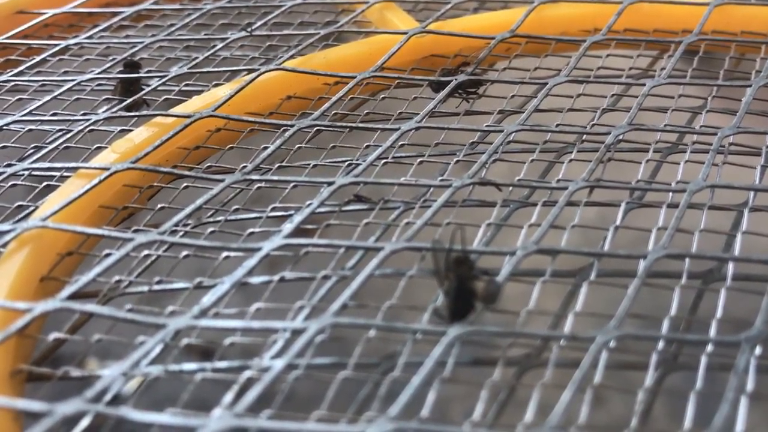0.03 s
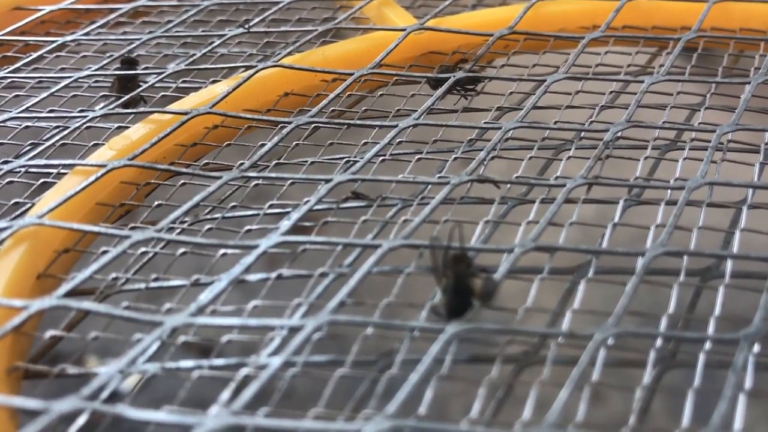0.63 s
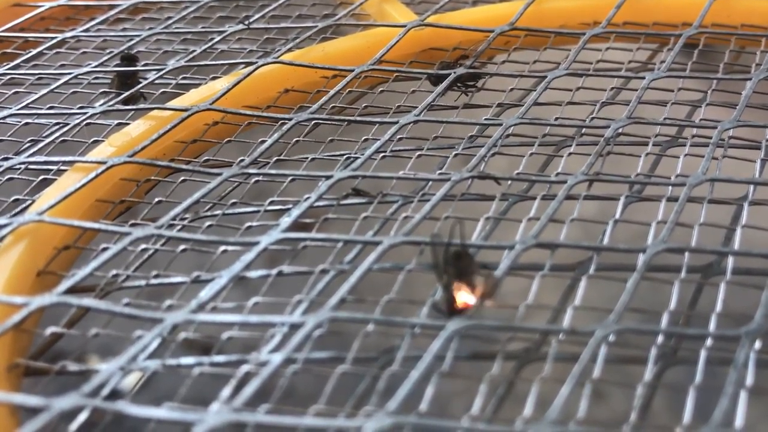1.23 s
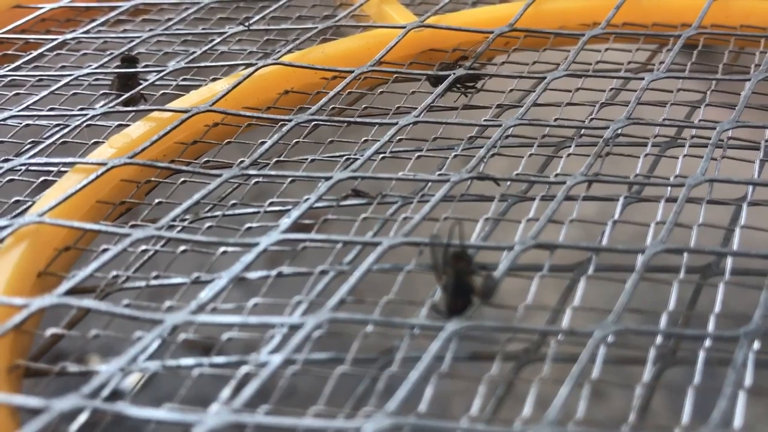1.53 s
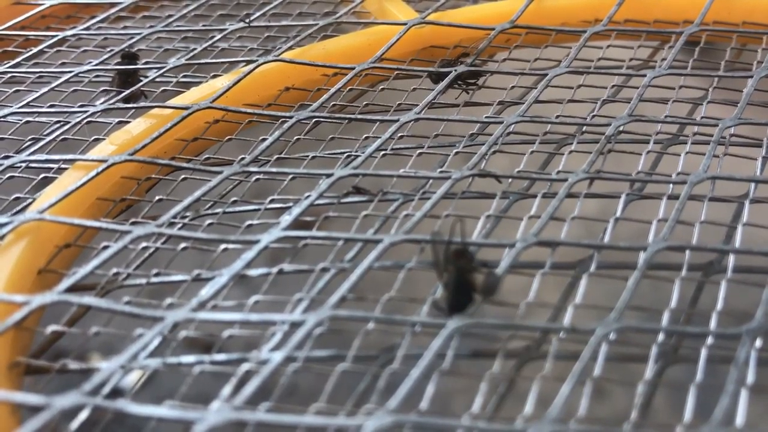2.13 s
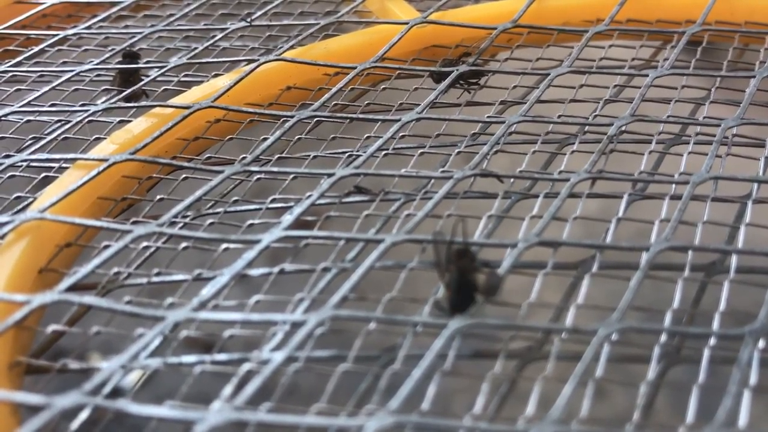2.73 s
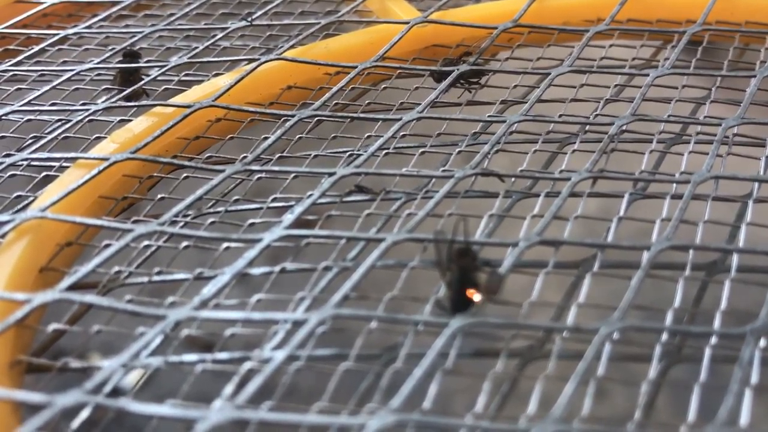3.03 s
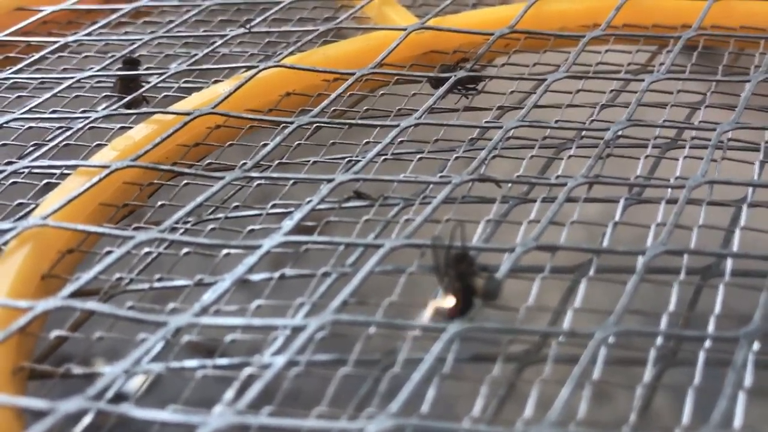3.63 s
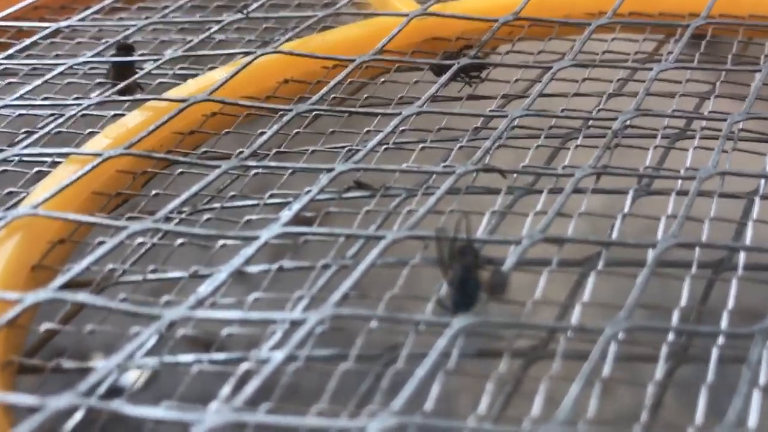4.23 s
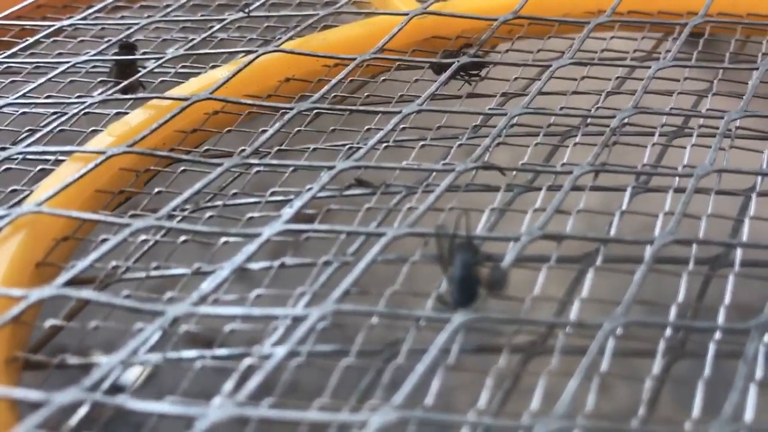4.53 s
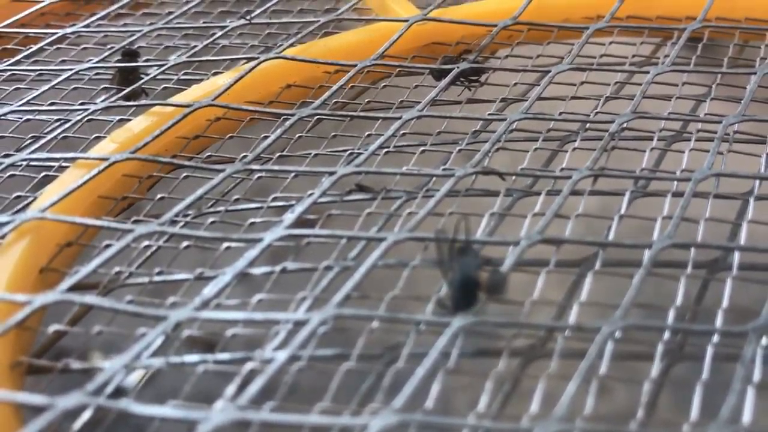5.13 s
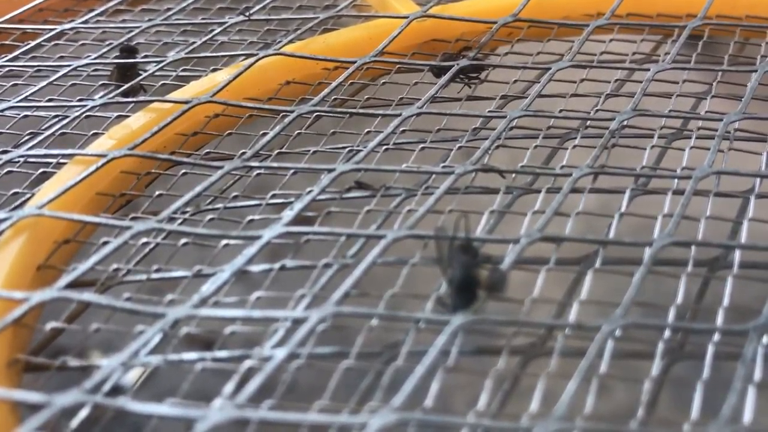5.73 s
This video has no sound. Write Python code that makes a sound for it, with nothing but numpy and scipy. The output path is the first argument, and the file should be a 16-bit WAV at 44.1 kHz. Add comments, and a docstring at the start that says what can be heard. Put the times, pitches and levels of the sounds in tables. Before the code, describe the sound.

In a quiet, humming room, an electric swatter discharges through a trapped fly three times, each a hard snapping pop that distorts the close microphone. The background drops away after each pop and swells back. Tiny bright spark ticks are scattered around the pops, and a faint high charging whine sags and recovers. The second half is much quieter, with a few ticks and brief, faint sizzles.

```python
"""A humming room, close to an electric fly swatter with a fly caught in its mesh.
The converter whines thinly, sagging in pitch under load; small sparks tick, a corona hisses, the fly fries.
Three times the capacitor discharges with a bang that overloads the microphone and rings briefly in the room.
Gain control ducks the hum after each bang and lets it swell back. Later the fly leaks current and sizzles."""
import sys
import numpy as np
from scipy import signal
from scipy.fft import rfft, irfft, next_fast_len
from scipy.io import wavfile
from scipy.ndimage import uniform_filter1d, minimum_filter1d, map_coordinates

SR = 44100
rng = np.random.default_rng(int(sys.argv[2]) if len(sys.argv) > 2 else 0)


def wav_record(signal):
    """Record a signal, one row per channel, as 16-bit PCM in the file named by sys.argv[1]."""
    frames = np.transpose(np.atleast_2d(signal))
    bounded = np.clip(frames, -1, 1)
    # unit amplitude maps onto the largest positive 16-bit level
    quanta = np.round(bounded * 32767).astype(np.int16)
    wavfile.write(sys.argv[1], SR, quanta)


N = 263277

# motor hum: f/Hz, level/dB
HUM_LINES = [(59, -49), (78, -53), (98, -67), (146, -63), (194, -55.5), (241, -52), (291, -66), (340, -66),
             (587, -71)]
# ringing rush: f/Hz, width/Hz, level/dB
RUSH_PEAKS = [(1357, 67, 7), (2650, 32, 5.5), (2780, 47, -2.5), (3270, 4100, -8.5), (3350, 25, -0.5),
              (6400, 60, -7.5)]
# envelopes: t/s, level/dB
RUSH_ENVELOPE = [(0, -8.5), (1.1, -1), (1.7, -21), (3.0, -9), (3.45, 6.5), (3.9, 3.5), (4.7, 0),
                 (5.3, -6.5)]
FRY_ENVELOPE = [(0, -9), (3.6, -7), (4.15, 5), (4.6, -1.5), (5.5, -2), (5.97, 10)]
# standing wave at the whine's pitch: f/Hz, gain/dB
STANDING_WAVE = [(8000, 7), (8180, 2.5), (8250, -.5), (8350, 0), (8400, -8), (8450, 0), (8490, 2),
                 (8520, 1)]
# small sparks: t/s, level/dB, relative body/dB, relative fizz/dB
SPARK_EVENTS = [(0.099, -24.5, -15, -14), (0.3964, -38, -11, -12), (0.9612, -34, -7.5, -7),
                (0.991, -40.5, -13, -3), (1.091, -32.5, -16, -18), (1.3417, -25.5, -9.5, -13),
                (1.4599, -27, -12, -21), (1.6391, -31, -20, -7), (2.542, -14.5, -13, -24),
                (2.822, -31.5, -9.5, -6.5), (2.863, -30, -16, -11), (2.9855, -33, -14, -18),
                (3.141, -23.5, -13, -15), (3.7424, -31, -13, -4), (3.8358, -33.5, -17, -9.5),
                (3.8793, -33, -14, -14), (4.0882, -29, -8, -19), (5.7674, -37, -15, -9)]
# room decay: f/Hz, T60/s
ROOM_T60 = [(300, 0.15), (3500, 0.27), (8000, 0.31), (15000, 0.23)]
# coronas: t/s, length/s, level/dB
CORONA_EVENTS = [(0.1, .92, -71), (1.64, 0.74, -72), (2.545, 0.41, -72), (3.143, 1.11, -69.5)]
# discharges: t/s, crack/dB, snap delay/s, relative snap/dB, filter ring/dB, echo/dB, thump time scale
DISCHARGE_EVENTS = [(0.4887, -1.5, 0.0034, 8, 2, -3, 0.94), (1.954, 1, 0.0033, 3, 2, -5.5, 0.94),
                    (3.1994, -2.5, 0.00361, -10.5, -4.5, -3.5, 1.007)]
# leaks through the fly: t/s, length/s, pitch drop/Hz, sizzle/dB
LEAK_EVENTS = [(4.096, .13, 131, -60), (4.36, .1, 200, -73), (4.784, 0.045, 402, -63),
               (5.104, .08, 207, -59), (5.288, .2, 125, -69)]
# spectral shapes: f/Hz, level/dB
RUMBLE_SHAPE = [(20, -36), (30, -40), (40, -0.5), (60, -4), (80, 0.5), (120, -13.5), (190, -11.5),
                (240, -12.5), (310, -18.5), (370, -17.5), (460, -42.5), (900, -90)]
AIR_SHAPE = [(150, -5), (450, 5), (750, 1.5), (1000, 8.5), (1300, 3), (2000, -4.5), (3000, -8), (4800, -15),
             (6800, -12), (7700, -20.5), (9600, -21.5), (10400, -25.5), (11800, -25), (14000, -31),
             (16000, -52)]
TICK_SHAPE = [(500, -35), (2000, -11.5), (4000, 0.5), (7000, 7), (10500, 3), (13000, 11), (16000, -5)]
ECHO_SHAPE = [(300, 3.5), (1000, -8), (2300, -10), (3500, -3.5), (6000, -1), (9000, 0.5), (13000, 5),
              (16000, -3.5)]
CORONA_SHAPE = [(7000, -19), (9000, -5), (10400, -9), (11800, 2), (13600, -2.5), (15000, -13), (16000, -31)]
SHOCK_SHAPE = [(100, -9), (400, 5), (900, 7), (1500, 3.5), (2500, -1), (3300, -15), (4200, -5.5),
               (6000, -8), (9000, -8), (12500, -9.5), (16000, -19.5)]
FRY_ROLLOFF = [(13500, 2.5), (16000, -26.5)]
BODY_SHAPE = [(500, -24), (1500, -8.0), (4000, 2.5), (7000, -21.5)]
SPUTTER_SHAPE = [(1200, -21.5), (3500, 3.5), (8000, -6.5), (16000, -3.0)]
SELF_NOISE_SHAPE = [(300, -7.5), (1200, -4.0), (3000, -7.0), (14000, -22), (16000, -36)]
# ringing of the recorder's filter: f/Hz, level/dB
RING_TONES = [(405, 0.5), (510, -3.5), (690, -11.5)]


def amp(db):
    """Decibels to gain."""
    return 10 ** (np.asarray(db) / 20)


def unit(x):
    """x at rms 1."""
    return x / np.sqrt(np.mean(x ** 2) + 1e-20)


def along(points, hz):
    """(f/Hz, value) points read on a log axis."""
    f, v = np.transpose(points)
    return np.interp(np.log(hz + 1), np.log(f + 1), v)


def clock(size=N):
    """Sample times in s."""
    return np.arange(size) / SR


def since(s):
    """Seconds since s, zero before."""
    return np.maximum(clock() - s, 0)


def curve(points):
    """(t/s, value) points, linear between."""
    return np.interp(clock(), *np.transpose(points))


def wobble(rate_hz):
    """Smooth random curve, rate_hz knots a second."""
    coarse = clock()[::32]
    knots = rng.standard_normal(int(N * rate_hz / SR) + 4)
    return np.interp(clock(), coarse, map_coordinates(knots, [coarse * rate_hz]))


def filtered(x, response):
    """x through a frequency response."""
    m = next_fast_len(len(x) + SR // 4)
    return irfft(rfft(x, m) * response(np.fft.rfftfreq(m, 1 / SR)), m)[:len(x)]


def noise(shape, size=N):
    """Coloured noise, rms 1."""
    return unit(filtered(rng.standard_normal(size), lambda hz: amp(along(shape, hz))))


def crackle(rate_hz, size=N):
    """Tiny random ticks, rms 1."""
    hits = rng.standard_normal(size) * (rng.random(size) < rate_hz / SR)
    return unit(filtered(hits, lambda hz: amp(along(TICK_SHAPE, hz))))


def pulse(shape, size=2048):
    """Minimum-phase pulse, peak 1."""
    cepstrum = irfft(np.log(amp(along(shape, np.fft.rfftfreq(size, 1 / SR)))))
    cepstrum[1:size // 2] *= 2
    cepstrum[size // 2 + 1:] = 0
    p = irfft(np.exp(rfft(cepstrum)))
    return p / np.abs(p).max()


def add(track, s, sound):
    """Mix sound into track at time s."""
    part = track[max(round(s * SR), 0):][:len(sound)]
    part += sound[:len(part)]


def motor_hum(drift_hz=2.047, waver_db=3):
    """Motor lines, each drifting in pitch and level."""
    phase = lambda hz: 2 * np.pi * np.cumsum(hz + drift_hz * wobble(10)) / SR
    return np.sqrt(2) * sum(amp(db + waver_db * wobble(9)) * np.sin(phase(hz)) for hz, db in HUM_LINES)


def room_tone(rumble_db=-44, air_db=-53, air_fade_db_per_s=0.43, rush_db=-62):
    """Motor hum, faint ringing rush, low rumble, soft air noise."""
    hum = motor_hum()
    peaks = lambda f: sum(amp(db) / (1 + (2 * (f - hz) / width) ** 2) for hz, width, db in RUSH_PEAKS)
    rush = amp(rush_db + curve(RUSH_ENVELOPE)) * unit(filtered(rng.standard_normal(N), peaks))
    rumble = amp(rumble_db + 1.6 * wobble(2.9)) * noise(RUMBLE_SHAPE)
    air = amp(air_db - air_fade_db_per_s * clock() + 0.36 * wobble(13)) * noise(AIR_SHAPE)
    return hum + rush + rumble + air


def converter_pitch(full_hz=8520, start_drop_hz=64.1, spark_drop_hz=225, charred_drop_hz=159,
                    full_drop_db=-31.5, load_s=0.015, recharge_s=0.14, leak_recovery_s=0.067):
    """Sparks and leaks pull the pitch down; it climbs as the capacitor refills."""
    t = clock()
    drops = [start_drop_hz * np.exp(-t / recharge_s)]  # not quite full at first
    for s, db, *_ in SPARK_EVENTS + DISCHARGE_EVENTS:
        drop_hz = spark_drop_hz * min(amp(db - full_drop_db) ** 2, 1)
        drops.append(drop_hz * (t > s + load_s) * np.exp(-since(s + load_s) / recharge_s))
    charred_hz = charred_drop_hz * (t > LEAK_EVENTS[0][0])  # the charred fly draws a steady current
    for s, length_s, drop_hz, _ in LEAK_EVENTS:
        load = (1 - np.exp(-since(s) / load_s)) * np.exp(-since(s + length_s) / leak_recovery_s)
        drops.append(charred_hz + drop_hz * load)
    return full_hz - np.max(drops, axis=0)


def converter(whine_db=-65, flutter_hz=5, waver_db=0.4):
    """Charging whine; a standing wave ties its level to its pitch."""
    pitch_hz = converter_pitch() + flutter_hz * wobble(90)
    level = amp(whine_db + along(STANDING_WAVE, pitch_hz) + waver_db * wobble(33))
    return level * np.sqrt(2) * np.sin(2 * np.pi * np.cumsum(pitch_hz) / SR)


def narrow_hiss(hiss_db=-63.5, centre_hz=5770, half_width_hz=215, wander_hz=105, flare_db=1):
    """Thin band of hiss, wavering below the whine."""
    phase = 2 * np.pi * np.cumsum(centre_hz + wander_hz * wobble(11)) / SR
    band = lambda: filtered(rng.standard_normal(N), lambda hz: 1 / (1 + (hz / half_width_hz) ** 2))
    return amp(hiss_db + flare_db * wobble(11)) * unit(band() * np.sin(phase) + band() * np.cos(phase))


def frying(level_db=-78, spurt_db=5.0, spurt_rate_hz=24):
    """The fly fries faintly, in random spurts."""
    soft = filtered(crackle(rate_hz=700), lambda hz: amp(along(FRY_ROLLOFF, hz)))
    return amp(level_db + curve(FRY_ENVELOPE) + spurt_db * wobble(spurt_rate_hz)) * soft


def sparks(tick_db=-2.5, body_db=1, arc_s=0.0016, typical_db=-21.0, fizz_s=0.0089, echo_db=-45):
    """Small sparks across the fly: bright tick, then a fizz of weaker restrikes."""
    out, t = np.zeros(N), clock(SR // 20)
    for s, db, rel_db, fizz_db in SPARK_EVENTS:
        burn_s = arc_s * amp(0.51 * (db - typical_db))  # stronger sparks burn longer
        tick = noise(TICK_SHAPE, len(t)) * np.exp(-(t / burn_s) ** 2)
        body = noise(BODY_SHAPE, len(t)) * np.exp(-t / (2 * burn_s))
        strike = tick / np.abs(tick).max() + amp(rel_db + body_db) * body / np.abs(body).max()
        fizz = amp(fizz_db) / 2 * crackle(rate_hz=1300, size=len(t)) * np.exp(-t / fizz_s)
        add(out, s + .0005, amp(db + tick_db) * (strike + fizz))
        add(out, s, amp(db + echo_db) * room_tail(gap_s=0.0043, build_s=0.012))
    return out


def room_tail(gap_s, build_s):
    """Wall echoes build after a gap; each frequency decays at its own rate."""
    hz, t, bins = signal.stft(noise(ECHO_SHAPE, SR // 2), SR, nperseg=256)
    decay = amp(-60 * t / along(ROOM_T60, hz)[:, None])
    tail = signal.istft(bins * decay, SR, nperseg=256)[1]
    return tail * np.clip((clock(len(tail)) - gap_s) / build_s, .12, 1)


def corona(edge_s=.012):
    """High corona hiss on the fly, lit by a spark until it goes out."""
    level = sum(amp(db) * (1 - np.exp(-since(s) / edge_s)) * np.exp(-since(s + length_s) / edge_s)
                for s, length_s, db in CORONA_EVENTS)
    return level * noise(CORONA_SHAPE)


def filter_ring(half_size=2048, swell_s=0.0033, fade_s=0.0079):
    """The recorder's filter rings hollowly near 400 Hz, swelling into each crack and fading after."""
    t = clock(2 * half_size) - half_size / SR
    ring = sum(amp(db) * np.cos(2 * np.pi * hz * t) for hz, db in RING_TONES)
    return ring * np.exp(np.where(t < 0, t / swell_s, -t / fade_s))


def crack(sputter_db, arc_s):
    """Shock front, then a brief, bright, sputtering arc."""
    shock = pulse(SHOCK_SHAPE)
    age = clock(len(shock)) / arc_s
    sputter = noise(SPUTTER_SHAPE, len(age)) * age * np.exp(-age ** 2)
    return shock / np.linalg.norm(shock) + amp(sputter_db) * sputter / np.linalg.norm(sputter)


def thump(scale, first_cycle_s=0.0016, slowing=0.387, rise_s=0.0038, hold_s=0.0097, fade_s=0.016):
    """The overloaded microphone swings to rest in ever slower waves; scale stretches time."""
    t = clock(SR // 5) / scale
    swing = np.sin(2 * np.pi * (t / first_cycle_s) ** slowing)
    attack = 1 - np.exp(-2 * t / rise_s)
    decay = np.exp(-(np.maximum(t - hold_s, 0) / fade_s) ** 1.63)
    return swing * attack * decay


def discharges(gain_db=14, crack_db=10, thump_db=2, ring_db=-16, ring_lead_s=0.0017, echo_db=-24):
    """Capacitor discharge: crack, snap, bright echo; the recorder's filter rings, the microphone thumps."""
    out, ring = np.zeros(N), filter_ring()
    for s, db, delay_s, snap_db, rel_ring_db, room_db, scale in DISCHARGE_EVENTS:
        add(out, s - ring_lead_s - len(ring) / 2 / SR, amp(ring_db + rel_ring_db) * ring)
        add(out, s, -amp(crack_db + db) * crack(sputter_db=-3.5, arc_s=0.00033))
        add(out, s + delay_s, amp(crack_db + db + snap_db) * crack(sputter_db=-16.5, arc_s=0.00044))
        add(out, s, amp(thump_db) * thump(scale))
        add(out, s, amp(echo_db + room_db) * room_tail(gap_s=0.003, build_s=.011))
    return amp(gain_db) * out


def leaks(rate_hz=900, fade_share=.7):
    """The fly conducts for a moment: a fading sizzle."""
    out, t = np.zeros(N), clock(SR // 2)
    for s, length_s, _, db in LEAK_EVENTS:
        add(out, s, amp(db) * crackle(rate_hz, len(t)) * np.exp(-t / (fade_share * length_s)))
    return out


def scene():
    """The swatter in its room, mono."""
    swatter = discharges() + sparks() + leaks() + corona() + frying() + converter() + narrow_hiss()
    return (swatter + room_tone())[None]


def gain_control(x, limit_db, hold_s, release_db_per_s, ahead_s=0.0038):
    """Loud sound pulls the gain down at once; it holds, then recovers."""
    power = np.abs(uniform_filter1d(x ** 2, SR // 80))
    needed_db = np.minimum(limit_db - 10 * np.log10(power + 1e-12), 0)
    span, lead = int(hold_s * SR) | 1, int(ahead_s * SR) + 1
    held_db = minimum_filter1d(needed_db, span, origin=span // 2 - lead)
    ramp_db = release_db_per_s * clock()
    gain_db = np.minimum.accumulate(held_db - ramp_db) + ramp_db
    return x * amp(uniform_filter1d(gain_db, lead))


def record(dry, self_noise_db=-69, top_hz=16500):
    """Slow gain control, fast limiter, self-noise, soft overload, band limit."""
    x = gain_control(dry[0], limit_db=6.5, hold_s=0.33, release_db_per_s=22.5)
    x = gain_control(x, limit_db=-3, hold_s=0.19, release_db_per_s=330)
    x = x + amp(self_noise_db) * noise(SELF_NOISE_SHAPE)
    x = x / (1 + np.abs(x) ** 8) ** (1 / 8)
    return filtered(x, lambda hz: 1 / (1 + (hz / top_hz) ** 120))[None]


dry = scene()
out = record(dry)
wav_record(out)
```